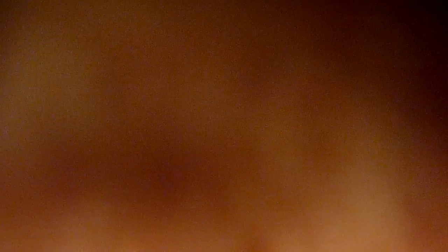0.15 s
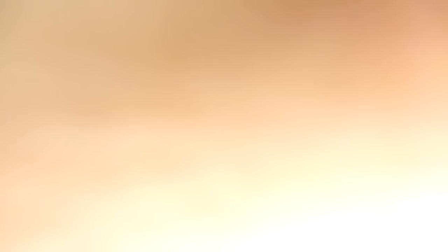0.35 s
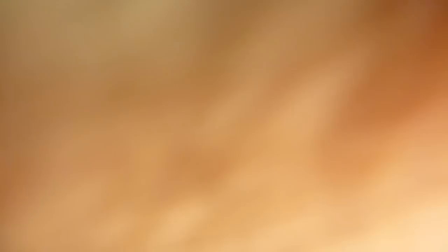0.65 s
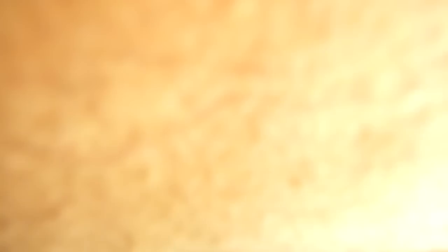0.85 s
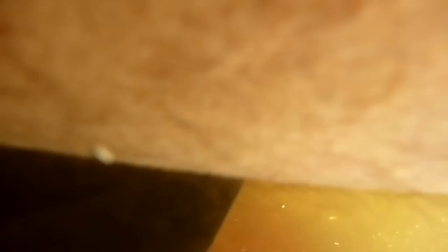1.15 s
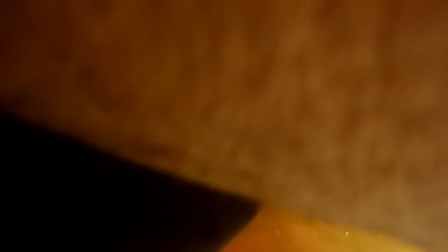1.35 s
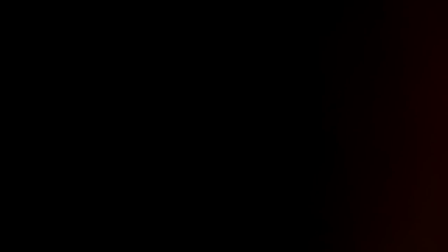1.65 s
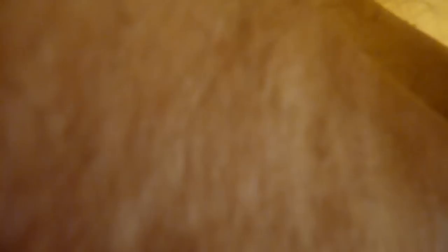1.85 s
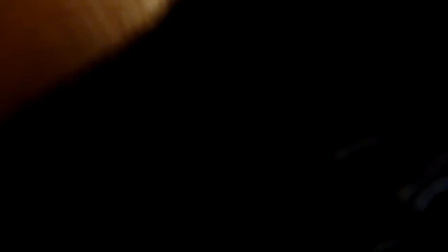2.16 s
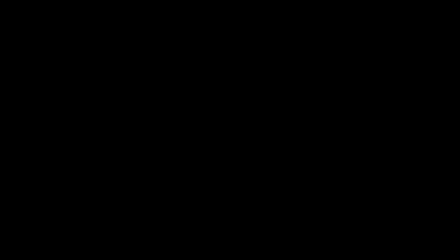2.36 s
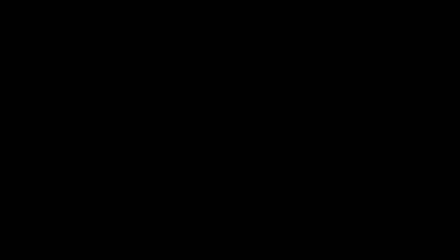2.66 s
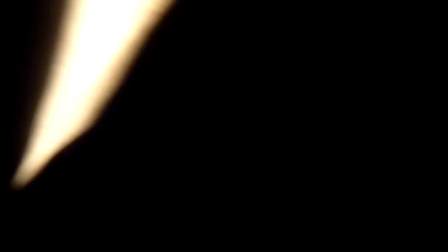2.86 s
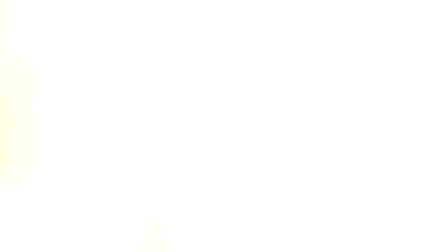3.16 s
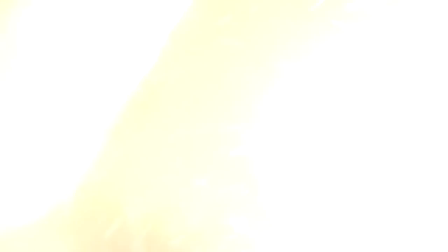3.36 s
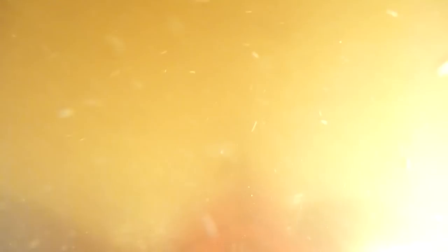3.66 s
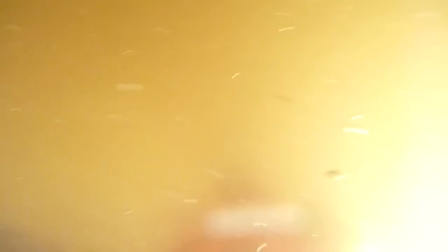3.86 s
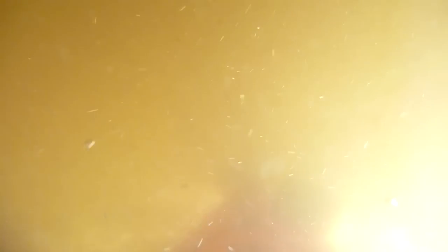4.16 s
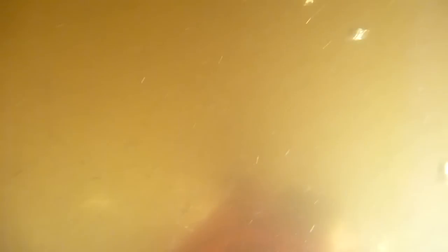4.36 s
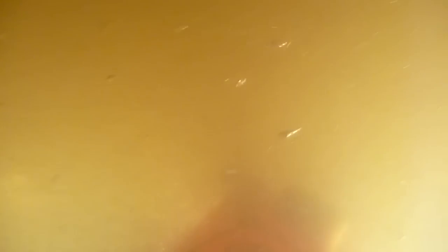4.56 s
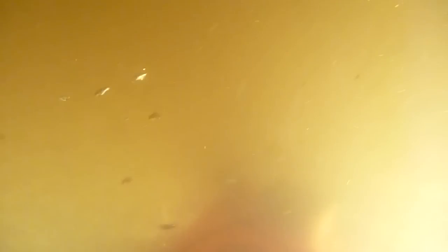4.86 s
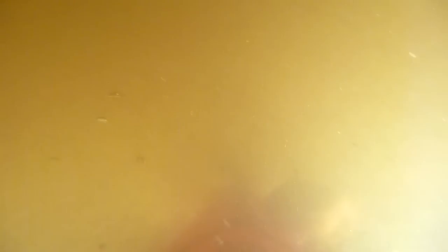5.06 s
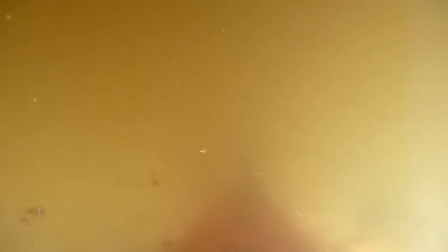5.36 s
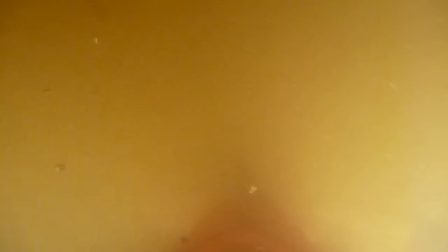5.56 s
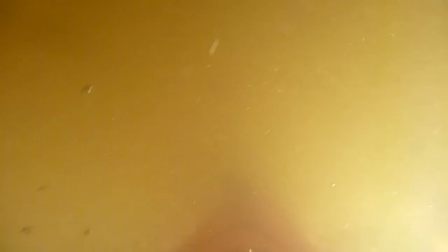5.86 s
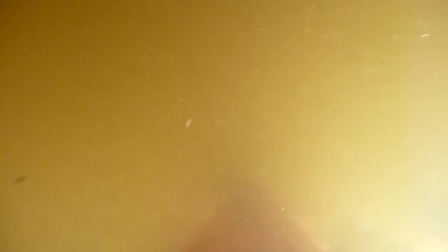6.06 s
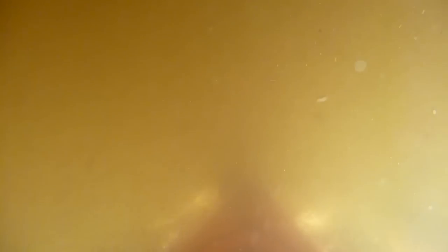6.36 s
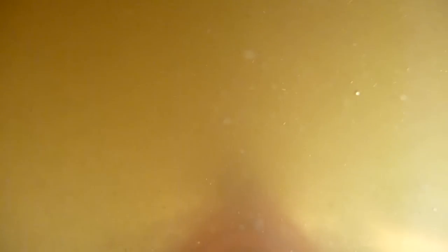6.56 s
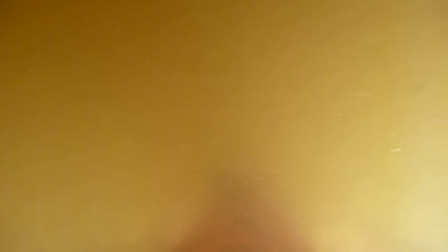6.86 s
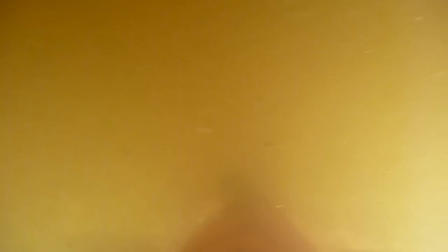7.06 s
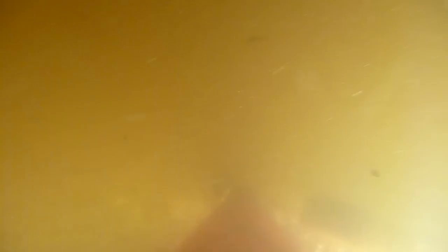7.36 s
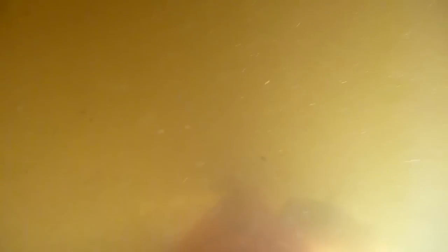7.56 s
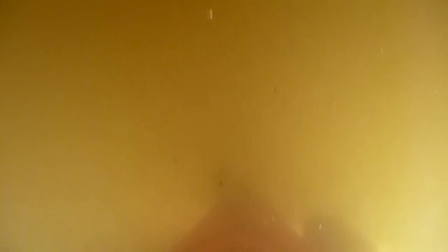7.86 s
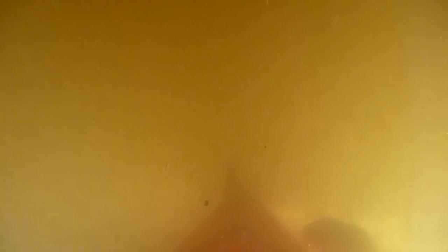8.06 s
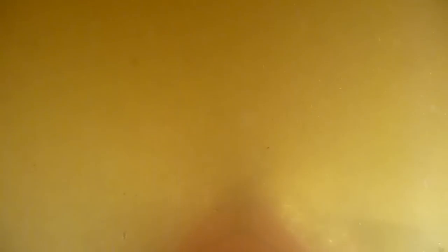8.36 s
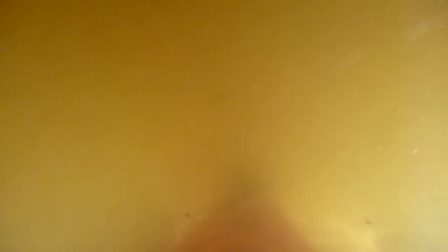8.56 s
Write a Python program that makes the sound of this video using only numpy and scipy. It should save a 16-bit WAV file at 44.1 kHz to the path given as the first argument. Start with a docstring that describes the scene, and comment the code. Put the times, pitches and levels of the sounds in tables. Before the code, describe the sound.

Wet fingers slide over a plastic camera case with a grainy scrape, sharp clicks and dull thumps, very close to the microphone sealed inside. All around, a river churns, its underwater rush and rumble dulled by the shell. After a few seconds the hand settles and the sound eases a little. Irregular sloshing surges and hollow knocks continue, joined by small nearby bubble glugs and a faint hiss.

```python
"""Under a churning river, microphone inside a sealed camera case, everything heard through the plastic.
A hand grips, rubs and taps the case, right on top of the microphone, then holds it in the current.
Surges and air pockets bump the case and ring its shell. The water comes through as a muffled rumble,
slosh and rush under a faint hiss; in the second half single bubbles glug close by."""
import sys
import numpy as np
from scipy import signal
from scipy.fft import rfft, irfft, next_fast_len
from scipy.io import wavfile
from scipy.ndimage import uniform_filter1d, map_coordinates

SR = 44100
rng = np.random.default_rng(int(sys.argv[2]) if len(sys.argv) > 2 else 0)


def output_pcm(signal):
    """Save a mono or channel-first signal as 16-bit PCM at the path in sys.argv[1].

    Samples are clipped to [-1, 1] before scaling.
    """
    pcm = np.clip(np.atleast_2d(signal).T, -1, 1) * 32767
    wavfile.write(sys.argv[1], SR, np.round(pcm).astype(np.int16))


N = 384552

# bright resonance of the case, set by the hold: t/s, f/Hz
GRIP = [(0, 2900), (1, 2560), (1.2, 3477), (2.98, 3498), (3.03, 2950), (3.2, 2960), (3.4, 3570),
        (8.72, 3390)]


def amp(db):
    """Gain of a level in dB; all table levels are relative."""
    return 10 ** (np.asarray(db) / 20)


def unit(x):
    """x at rms 1."""
    return x / np.sqrt(np.mean(x ** 2) + 1e-20)


def curves(rows):
    """One value per sample for each column after the time, -120 outside the rows."""
    times, *columns = np.transpose(rows)
    return [np.interp(np.arange(N) / SR, times, column, -120, -120) for column in columns]


def summed(db):
    """Gain per sample of events given as rows of dB on a millisecond grid, added in power."""
    gain = np.sqrt(np.sum(amp(db) ** 2, axis=0))
    return np.interp(np.arange(N) / SR, np.arange(len(gain)) / 1000, gain)


def wobble(rate):
    """A smooth random curve, rate knots a second."""
    return map_coordinates(rng.standard_normal(int(N * rate / SR) + 4), [np.arange(N) * rate / SR])


def filtered(x, response):
    """x times a complex response of frequency."""
    size = next_fast_len(N + SR // 2)
    return irfft(rfft(x, size) * response(np.fft.rfftfreq(size, 1 / SR)), size)[:N]


def coloured(x, spectrum):
    """x shaped by (f/Hz, level/dB) points on a log frequency axis."""
    f, db = np.transpose(spectrum)
    return filtered(x, lambda hz: amp(np.interp(np.log(hz + 1), np.log(f + 1), db, -120, -120)))


def lumpy(spectrum, rate, depth_db, fast_db):
    """Coloured noise of rms 1 whose level heaves at rate and flutters four times faster."""
    heave = amp(depth_db * wobble(rate) + fast_db * wobble(4 * rate))
    return unit(coloured(heave * rng.standard_normal(N), spectrum))


def bubbles(count, hz, spread, cycles, size_db, samples):
    """A cloud of bubbles, rms 1: damped sines with a soft start and a rising pitch."""
    when, rank = rng.uniform(size=(2, count, 1))
    pitch = hz * np.exp(spread * rng.uniform(-1.51, 1.577, (count, 1)))
    k = np.arange(samples)
    turns = pitch * k / SR
    life = turns / cycles
    shape = (1 - np.exp(-turns)) ** 2 * (1 - k / samples) ** 2 * np.exp(-3 * life)
    gain = amp(-size_db * np.log(rank + 0.05)) * (hz / pitch) ** 0.7
    rings = gain * shape * np.sin(2 * np.pi * turns * (1 + 0.086 * life))
    return unit(np.bincount(((when * N).astype(int) + k).ravel(), rings.ravel(), N)[:N])


def gurgle(count, decay_s):
    """Air pockets burst at random: a gain that jumps up and dies away, rms 1."""
    when, rank = rng.uniform(size=(2, count))
    kicks = np.bincount((when * N).astype(int), -np.log(rank + 0.12), N)
    softened = uniform_filter1d(kicks, size=128)
    return unit(0.5 + signal.lfilter([1], [1, -np.exp(-1 / (decay_s * SR))], softened))


def surges():
    """Gains of rumble, slosh, rush and fizz: the current plus surges that jump up, hold and die away."""
    # water or hand pushing the case: start/s, hold/s, slosh/dB, rumble over slosh/dB
    pushes = [(0.108, 0.077, -26, -14), (0.26, 0.092, -20.5, -3.5), (0.597, 0.27, -32, -10),
              (1.083, 0.52, -38.5, 15), (1.263, 0.062, -21.5, -2), (1.466, 0.083, -19.5, 3.5),
              (1.934, 0.093, -24.5, -1.5), (2.287, 0.015, -20, -20), (2.683, 0.034, -20.5, 1),
              (2.782, 0.086, -24.5, -3), (3.213, 0.06, -34.5, -20), (3.472, 0.097, -37, -2.5),
              (3.658, 0.13, -26.5, -2), (4.013, 0.13, -37, -4.5), (4.257, 0.19, -36, -1),
              (4.687, 0.06, -29.5, -4), (4.896, 0.047, -41.5, 9), (5.144, 0.021, -46.5, 18),
              (5.404, 0.016, -30.5, -25), (5.425, 0.08, -42, 10), (5.744, 0.13, -27.5, 6.5),
              (5.953, 0.096, -31.5, 9.5), (6.128, 0.097, -32, -4), (6.263, 0.26, -37.5, 2),
              (6.67, 0.027, -42, -1), (6.821, 0.06, -25.5, 0.5), (7.022, 0.076, -30.5, 2.5),
              (7.22, 0.17, -30, 3.5), (7.724, 0.09, -47, 14.5), (7.876, 0.069, -27.5, -22),
              (8.378, 0.12, -25, -8), (8.68, .05, -24.5, -34)]
    # the current between surges: t/s, body/dB, treble/dB
    flow = [(0, -36, -47.5), (.55, -41, -56.5), (1.1, -34, -50), (1.8, -39.5, -44.5), (2.5, -28, -43),
            (3.0, -40.5, -46), (3.4, -46, -52), (4.3, -42.5, -55.5), (5.6, -41.5, -46.5), (6.7, -49, -50.5),
            (7.5, -40.5, -47), (8.1, -37.5, -42), (8.72, -36.5, -36)]
    attack_db_per_s, release_db_per_s = 597, 162.5
    start, hold, db, deep_db = np.transpose(pushes)[..., None]
    t = np.arange(N * 1000 // SR + 2) / 1000 - start
    slosh_db = db + np.minimum(0, np.minimum(attack_db_per_s * t, release_db_per_s * (hold - t)))
    rush_db = slosh_db - 12 - 0.27 * deep_db  # deeper surges carry less rush
    body_db, treble_db = curves(flow)
    pushed = [slosh_db + deep_db, slosh_db, rush_db, slosh_db - 20]
    steady = [body_db, body_db, treble_db + 5.5, treble_db]
    return [np.hypot(summed(up_db), amp(calm_db)) for up_db, calm_db in zip(pushed, steady)]


def water():
    """The river all round the case: four bands of lumpy noise, each with bubbles of its own size."""
    # spectra of the four bands and of the smallest bubbles through the shell: f/Hz, level/dB
    rumble_band = [(20, -48), (40, -22), (70, -6), (170, 2), (260, -5.5), (400, -10.5), (700, -57.5)]
    slosh_band = [(150, -41), (260, -8), (400, -3.5), (650, -5), (950, -19.5), (1400, -18.5)]
    rush_band = [(600, -25.5), (950, -6), (1350, -1.5), (1950, -14.5), (2400, -10.5), (3000, -49)]
    fizz_band = [(1350, -40), (2300, -3), (2900, 1.5), (3500, -5.5), (4100, -11.5), (4750, -11.5),
                 (5800, -20.5), (7120, -29), (7900, -43.5)]
    sparkle_band = [(1900, -30.5), (2500, -0.5), (3100, 1.5), (4000, -8.5), (4700, -4), (6500, -16.5)]
    rumble = lumpy(rumble_band, rate=10, depth_db=6, fast_db=6)
    rumble += 0.27 * bubbles(count=150, hz=166, spread=0.1, cycles=10, size_db=-6.5, samples=2048)
    slosh = 1.58 * lumpy(slosh_band, rate=13, depth_db=2.5, fast_db=4)
    slosh += 0.83 * bubbles(count=260, hz=489, spread=0.32, cycles=14.3, size_db=1, samples=1536)
    rush = lumpy(rush_band, rate=14, depth_db=3, fast_db=1.25)
    rush += 0.92 * bubbles(count=380, hz=1140, spread=0.3, cycles=21, size_db=3.5, samples=1024)
    fizz = lumpy(fizz_band, rate=17, depth_db=3, fast_db=2.45)
    sparkle = bubbles(count=2500, hz=3670, spread=0.3, cycles=11, size_db=6, samples=256)
    fizz += 0.56 * unit(coloured(sparkle, sparkle_band))
    bursts = gurgle(count=130, decay_s=0.01)  # the slosh bursts, the rush follows more gently
    layers = [unit(rumble), bursts * unit(slosh), unit(bursts ** 0.65 * rush), unit(fizz)]
    return sum(gain * layer for gain, layer in zip(surges(), layers))


def sheen():
    """The highest hiss of the river is smooth and swells slowly."""
    # its spectrum: f/Hz, level/dB
    band = [(7900, -22.5), (8600, -2.5), (9900, -2), (12500, -14.5), (15200, -27)]
    # its swell: t/s, level/dB
    level = [(0, -78.5), (3.6, -87), (4.6, -80), (7.5, -75.5), (8.72, -72.5)]
    return amp(curves(level)[0]) * unit(coloured(rng.standard_normal(N), band))


def taps():
    """A hard contact rings the bright resonance for a few cycles, with a crack of noise."""
    # hard contacts on the case: peak time/s, level/dB
    contacts = [(0.017, -20), (0.035, -32), (0.152, -14), (0.312, -29), (0.4034, -5.5), (0.46, -19),
                (1.293, -25), (1.417, -23), (1.427, -14), (1.646, -20), (1.678, -22), (1.768, 2),
                (1.7727, -6), (1.879, -17), (1.928, -8), (1.942, -13), (1.978, -19), (2.005, -20),
                (2.049, -16), (2.094, -22.5), (2.131, -28), (2.157, -9), (2.167, 2), (2.2992, -15.5),
                (2.309, -18), (2.325, -10), (2.414, -16.5), (2.51, -2), (2.5158, -9.5), (2.6982, -9),
                (2.762, -6), (2.908, -8.5), (2.919, -10), (3.194, -34), (3.216, -29), (3.222, -15.5),
                (3.289, -34.5), (4.346, -35.5), (4.54, -37), (4.65, -39), (4.6966, -23), (4.742, -30),
                (5.7794, -21.5)]
    crack_above_db = -8.5  # harder contacts also crack in the treble
    out, t = np.zeros(N + SR), np.arange(-64, 1024) / SR
    wall = signal.butter(6, [600, 4700], "band", fs=SR, output="sos")  # the shell wall dulls the tap
    for (s, db), noise in zip(contacts, rng.standard_normal((len(contacts), len(t)))):
        shape = amp(db - 13.6 * np.where(t < 0, (t / 0.00045) ** 2, t / 0.0017))
        ring = shape * np.sin(2 * np.pi * np.interp(s, *np.transpose(GRIP)) * t)
        knock = signal.sosfilt(wall, 1.23 * ring + 1.18 * shape * noise)
        crack = 0.126 * (db > crack_above_db) * shape ** 2 * noise
        out[round(s * SR):][:len(t)] += knock + crack
    return out[64:][:N]


def bending(hz):
    """Response of bending waves in the shell: the treble arrives early, the bass late."""
    return np.exp(-2j * np.pi * (0.00797 * 330 * np.log(1 + hz / 330) - 0.002003 * hz))


def bumps():
    """Each bump is a short tone sagging in pitch within a thud; the shell rings on after it."""
    # blows on the case: peak time/s, level/dB, f/Hz, time to fall 8 dB/ms
    blows = [(0.1077, -12.5, 605, 10), (0.174, -12.5, 523, 5.4), (.265, -15, 392, 3.6),
             (0.287, -3.5, 524, 1), (0.3116, 0, 390, 1.5), (0.3383, -7, 423, 4.8), (0.3752, -2, 197, 1.1),
             (0.4076, -9, 214, 3.9), (0.459, -7, 235, 1.7), (0.7519, -1.5, 587, 2.4),
             (1.109, -22.5, 248, 12), (1.27, -9.5, 483, 4.8), (1.336, -9.5, 223, 1.8),
             (1.4802, -13, 221, 15), (1.5053, -20, 165, 18), (1.5302, -9, 240, 21),
             (1.5617, -3.5, 356, 1.8), (1.678, -15, 580, 7), (1.7326, -17.5, 663, 12),
             (1.7724, -12, 1180, 2), (1.963, -21, 215, 25), (2.05, -4.5, 650, 1.9), (2.0938, -11, 640, 3.8),
             (2.1675, -3, 191.7, 2.56), (2.3005, -5.5, 447, 0.68), (2.3501, -12, 283, 11),
             (2.4965, -14, 170, 11), (2.623, -14.5, 264, 4.7), (2.7, -8.5, 154, 5.6),
             (2.7353, -6, 370, 1.2), (2.825, -16, 417, 11), (2.875, -13, 407, 24), (2.9025, -12.5, 204, 14),
             (3.2213, -14.5, 680, 1.2), (3.239, -15, 166, 4), (3.538, -26, 622, 4.9),
             (3.6407, -17, 603, 6.4), (3.7937, -2.5, 340, 2.9), (4.5847, -13, 718, 6.8),
             (4.676, -14, 311, 13.4), (5.0427, -25, 380, 3.7), (5.2135, -9.5, 655, 4.4),
             (5.224, -14, 189, 13.4), (5.5427, -14, 568, 7.2), (5.695, -15, 210, 5.1),
             (5.749, -6.5, 320, 9.7), (5.775, -15.5, 179, 13), (5.954, -12, 325, 6.7),
             (6.1475, -18.5, 450, 14), (6.504, -20.5, 370, 5.2), (6.669, -27, 311, 12),
             (6.7884, -19.5, 757, 10), (6.8143, -4.5, 338, 6), (7.008, -14.5, 422, 8), (7.74, -19, 157, 11),
             (7.8926, -9, 512, 7), (8.3996, -5.5, 409, 9.9), (8.602, -13, 553, 5.3)]
    # noise of a bump: f/Hz, level/dB
    thud_band = [(30, -31), (80, -14.5), (300, 4.5), (700, -5.5), (1400, -7.5), (2300, -35.5), (3200, -25),
                 (6000, -50), (8000, -90)]
    # modes of the case: f/Hz, width/Hz, level/dB
    modes = [(183.6, 14, -2), (314, 11, -17)]
    sharp, settle_cycles = 0.051, 0.62  # a tone starts this share above its pitch, then settles
    tones, envelope = np.zeros((2, N + SR))
    lead = 2048
    t = np.arange(-lead, 6144) / SR
    for (s, db, hz, fall_ms), push in zip(blows, rng.choice([-1, 1], len(blows))):
        rise_ms = 0.7 + 420 / hz + 0.1 * fall_ms  # low, long bumps rise more slowly
        shape = amp(db - 8 * np.where(t < 0, (1000 * t / rise_ms) ** 2, 1000 * t / max(fall_ms, 1)))
        cycles = hz * t
        settling = settle_cycles * (1 - np.exp(-np.abs(cycles) / settle_cycles))
        sag = sharp * np.where(t < 0, cycles, settling)
        start = round(s * SR)
        tones[start:][:len(t)] += push * shape * np.cos(2 * np.pi * (cycles + sag))
        envelope[start:][:len(t)] += shape
    thud = envelope[lead:][:N] * unit(coloured(rng.standard_normal(N), thud_band))
    drive = 0.76 * tones[lead:][:N] + 0.5 * filtered(thud, bending)
    return filtered(drive, lambda f: 1 + sum(
        amp(db) * 1j * f * width / (hz ** 2 - f ** 2 + 1j * f * width) for hz, width, db in modes))


def rubbing():
    """Wet skin sticks and slips: a grainy hiss, brighter once the palm gives way to the fingers."""
    # spectra of palm and fingers on the case: f/Hz, level/dB
    palm_band = [(900, -0.5), (1600, -3), (2940, 2), (3460, -12), (5560, -27), (7240, -50.5), (10000, -43),
                 (15000, -64.5)]
    finger_band = [(1120, -21), (1900, -15.5), (2950, -5), (3480, -1), (4200, -8.5), (5700, -23),
                   (6480, -32), (8050, -60.5), (9820, -39.5), (13800, -75), (15000, -83.5)]
    # skin sliding on the case: middle/s, length/s, level/dB
    strokes = [(0.157, 0.026, -14.5), (0.323, 0.15, -18.5), (0.439, 0.1, -33), (0.636, 0.14, -27.5),
               (0.72, 0.78, -53), (1.268, 0.026, -30), (1.325, 0.14, -34), (1.515, 0.22, -22.5),
               (1.637, 0.074, -36), (1.763, 0.058, -32), (1.917, 0.067, -18.5), (2.011, 0.035, -32.5),
               (2.067, 0.012, -31), (2.126, 0.015, -33.5), (2.167, 0.016, -12.5), (2.263, 0.37, -32.5),
               (2.343, 0.063, -22), (2.55, 0.69, -29.5), (2.699, 0.05, -18), (2.777, 0.024, -21.5),
               (2.878, 0.27, -26), (3.08, 0.12, -32), (3.103, 0.022, -28), (3.143, 0.041, -30),
               (3.715, 0.15, -40.5)]
    edge_db, squareness, skew = 20, 2.2, 1.106  # a stroke is round-topped and starts faster than it ends
    palm_hz, finger_hz = GRIP[0][1], GRIP[2][1]
    finger_share = np.clip((curves(GRIP)[0] - palm_hz) / (finger_hz - palm_hz), 0, 1)
    palm = lumpy(palm_band, rate=31, depth_db=2.9, fast_db=4.5)
    fingers = lumpy(finger_band, rate=40, depth_db=2, fast_db=2)
    middle, length, db = np.transpose(strokes)[..., None]
    t = np.arange(N * 1000 // SR + 2) / 1000 - middle
    off_centre = np.abs(2 * t / length * np.where(t < 0, skew, 1 / skew))
    gain = summed(db - edge_db * off_centre ** squareness)
    return gain * (np.sqrt(1 - finger_share) * palm + np.sqrt(finger_share) * fingers)


def tone_bursts(rows, skew, rough):
    """Soft tones (t/s, level/dB, f/Hz, length/ms); skew hastens the rise, rough shakes the phase."""
    out, t = np.zeros(N + SR), np.arange(-4096, 6144) / SR
    jitter_ms = np.pad(rough * wobble(200), 6144, "reflect")
    for (s, db, hz, ms), phase in zip(rows, rng.uniform(size=len(rows))):
        start = round(s * SR)
        width_ms = ms * np.where(t < 0, 1 / skew, skew)
        shape = amp(db - 24 * (1000 * t / width_ms) ** 2)
        shake = hz / 1000 * jitter_ms[start:][:len(t)]
        out[start:][:len(t)] += shape * np.sin(2 * np.pi * (hz * t + phase + shake))
    return out[4096:][:N]


def shoves():
    """The whole case lurches for about two slow cycles."""
    # lurches: peak time/s, level/dB, f/Hz
    lurches = [(0.16, -11, 100), (1.992, -18, 73.4), (2.041, -28, 67), (2.166, -15.5, 81),
               (5.756, -16, 102), (8.411, -24, 91.8)]
    return tone_bursts([(s, db, hz, 1800 / hz) for s, db, hz in lurches], skew=1.06, rough=0)


def plops():
    """Single bubbles close to the case glug unsteadily about their own pitch."""
    # near bubbles: peak time/s, level/dB, f/Hz, length/ms
    glugs = [(4.051, -34, 4500, 2.8), (4.252, -31, 3180, 5), (4.615, -33, 2740, 5.5),
             (4.717, -31, 3330, 12), (5.652, -23, 1270, 5.2), (5.621, -24, 614, 20), (5.625, -29, 880, 20),
             (5.667, -23.5, 808, 26), (6.059, -21, 736, 9), (6.298, -33, 680, 49), (6.891, -32, 417, 9.5),
             (7.082, -23.5, 1120, 9.2), (7.237, -26.5, 403, 6.6), (7.831, -19.5, 880, 8.7),
             (7.845, -21, 1535, 6.7), (8.259, -25.5, 1187, 17), (8.278, -18.5, 824, 3.7),
             (8.528, -21, 530, 10), (8.541, -24.5, 1384, 19)]
    return tone_bursts(glugs, skew=1.7, rough=0.07)


def through_shell(x):
    """The free shell holds back one band; the hand damps the shell and fills that dip until it eases."""
    dip_hz, width_hz, dip_db = 2325, 203, -14.5
    free = np.interp(np.arange(N) / SR, [0.57, 2], [0.3, 1])  # the grip eases between 0.57 and 2 s
    dipped = filtered(x, lambda hz: amp(dip_db * np.exp(-((hz - dip_hz) / width_hz) ** 2)))
    return x + free * (dipped - x)


def scene():
    """All sources at the one microphone inside the case."""
    return (through_shell(water() + bumps()) + sheen() + plops() + rubbing() + shoves() + taps())[None]


def record(dry):
    """The loudest blows clip; nothing is kept above the band limit."""
    top_hz = 16300
    clipped = dry[0] / (1 + np.abs(dry[0]) ** 12) ** (1 / 12)
    return filtered(clipped, lambda hz: np.clip((top_hz - hz) / 500, 0, 1) ** 2)[None]


dry = scene()
out = record(dry)
output_pcm(out)
```